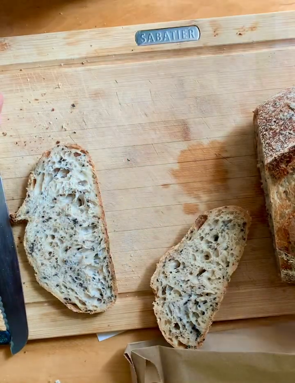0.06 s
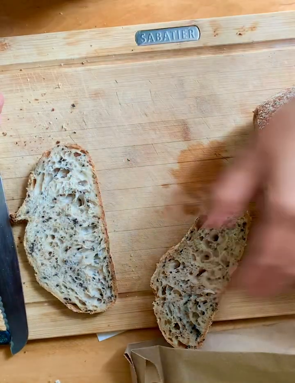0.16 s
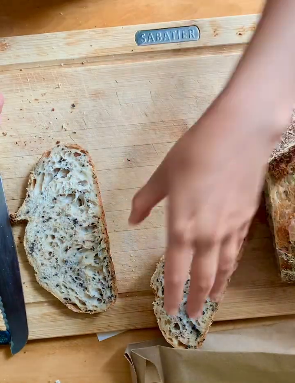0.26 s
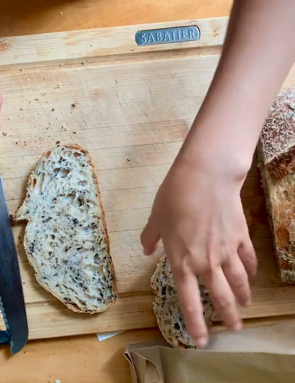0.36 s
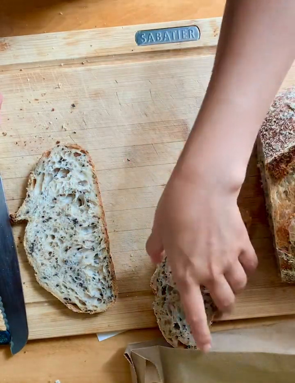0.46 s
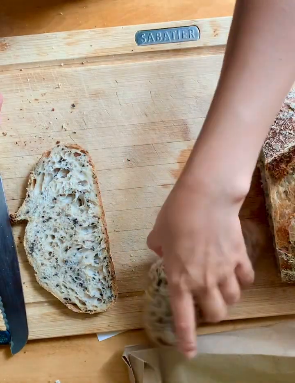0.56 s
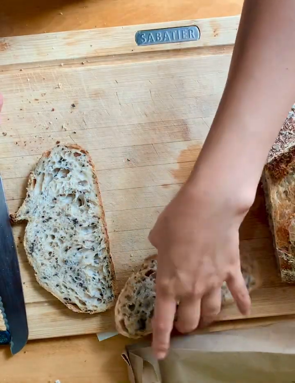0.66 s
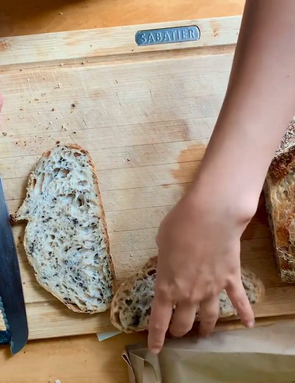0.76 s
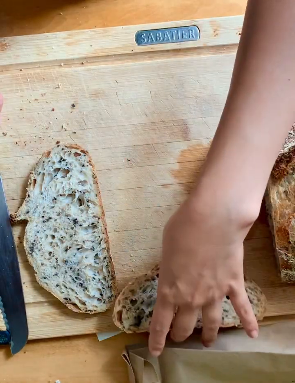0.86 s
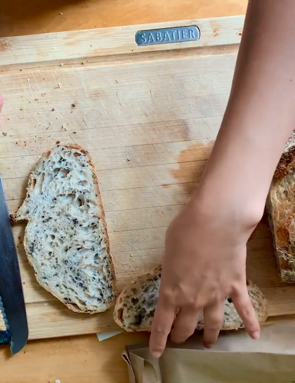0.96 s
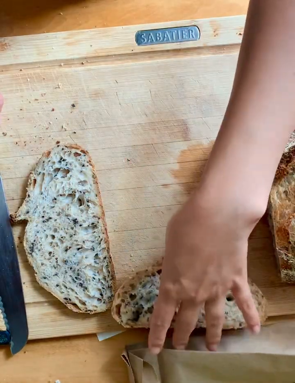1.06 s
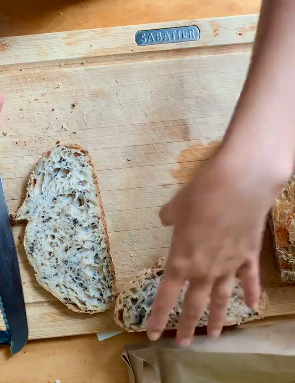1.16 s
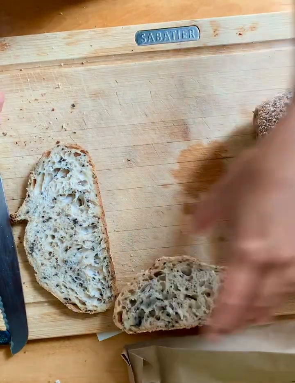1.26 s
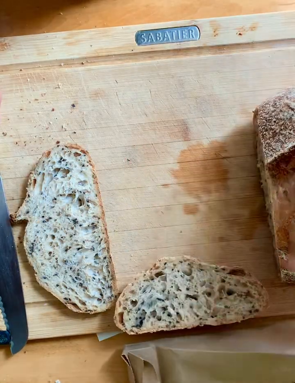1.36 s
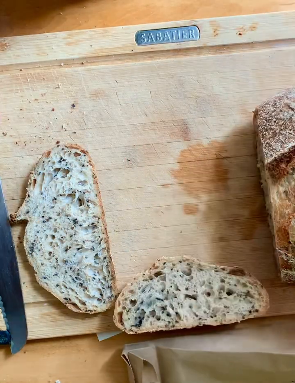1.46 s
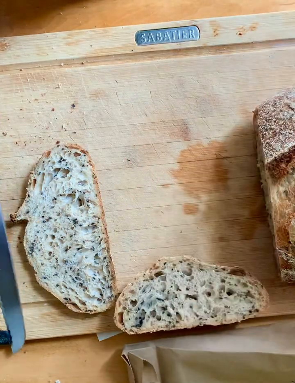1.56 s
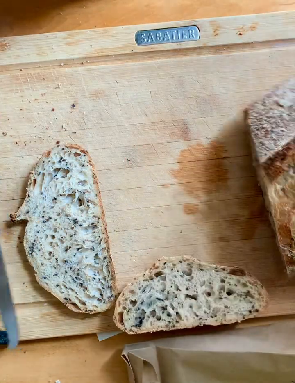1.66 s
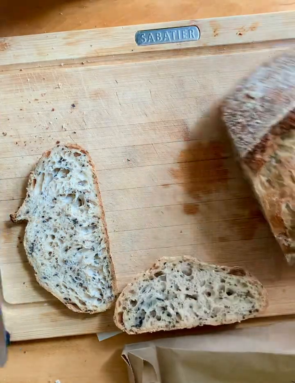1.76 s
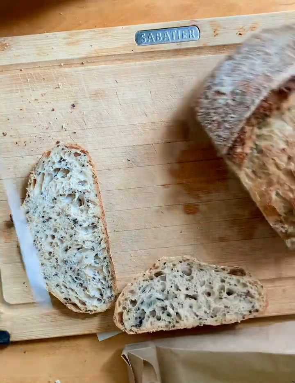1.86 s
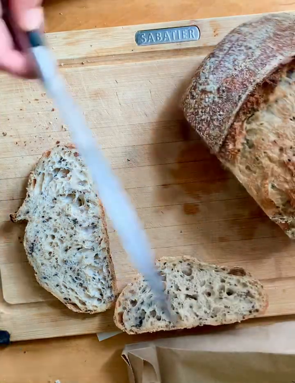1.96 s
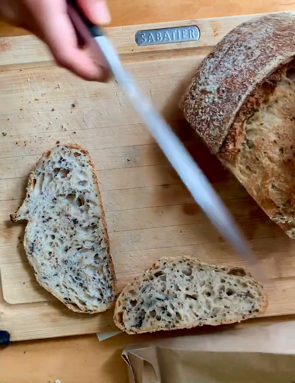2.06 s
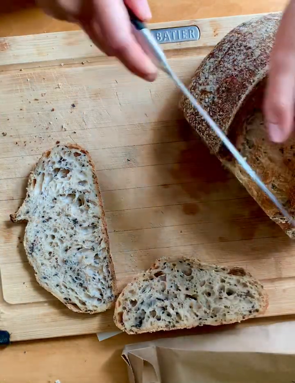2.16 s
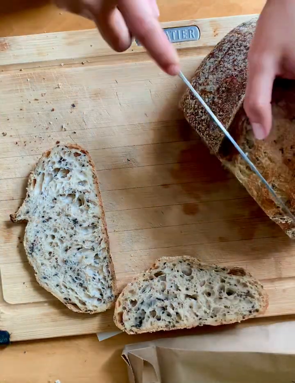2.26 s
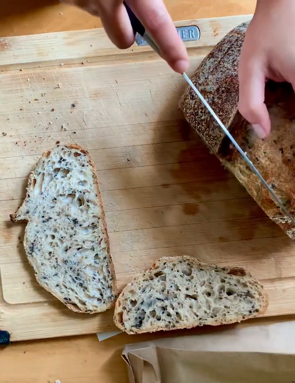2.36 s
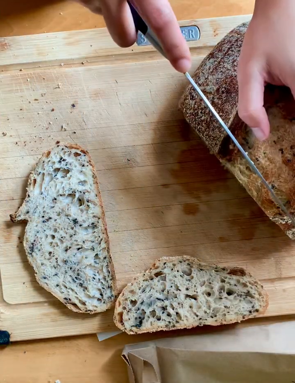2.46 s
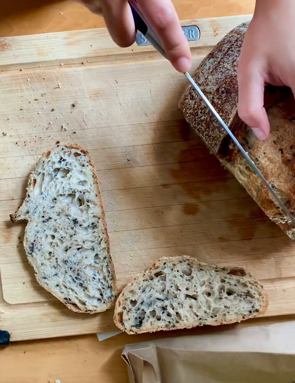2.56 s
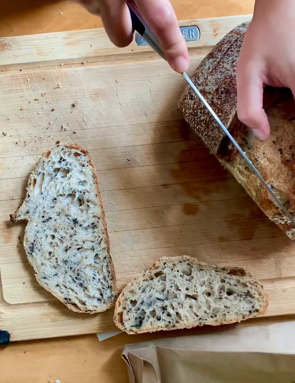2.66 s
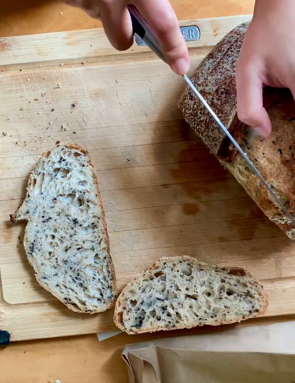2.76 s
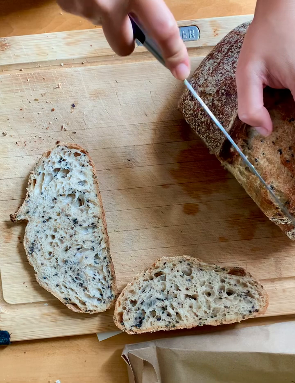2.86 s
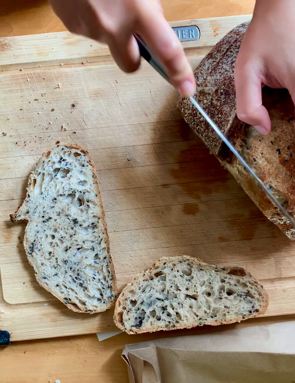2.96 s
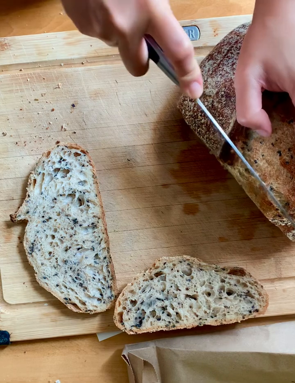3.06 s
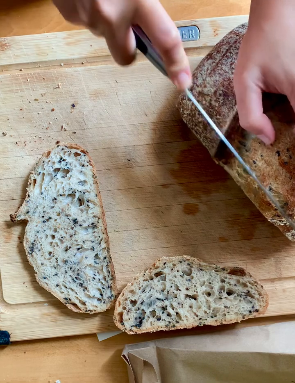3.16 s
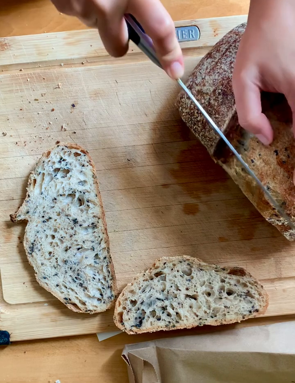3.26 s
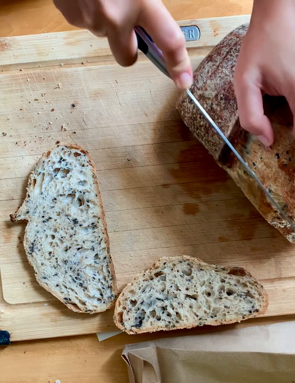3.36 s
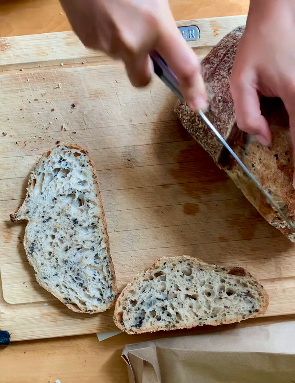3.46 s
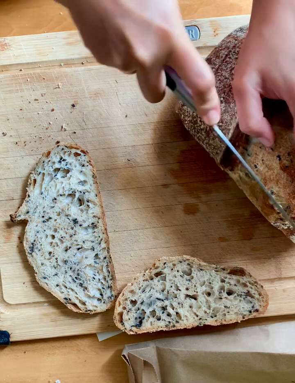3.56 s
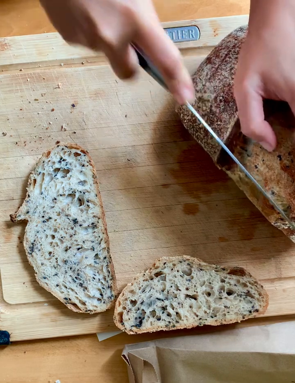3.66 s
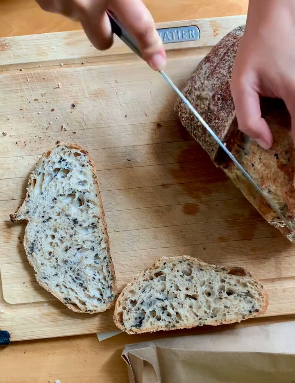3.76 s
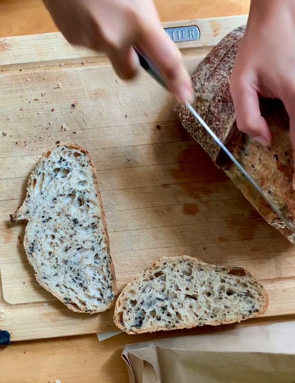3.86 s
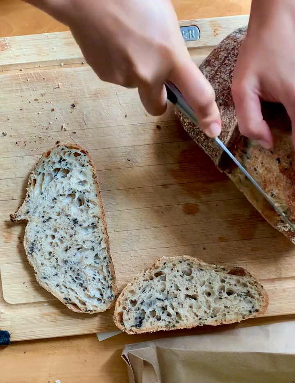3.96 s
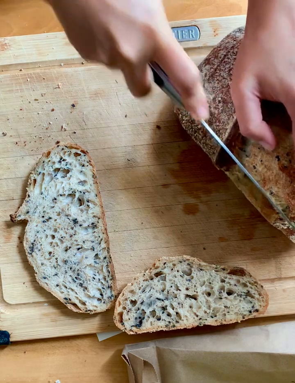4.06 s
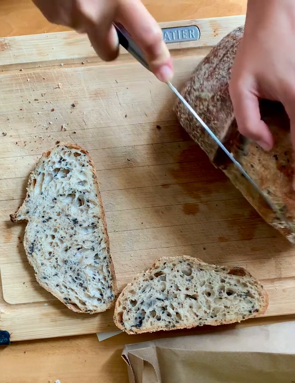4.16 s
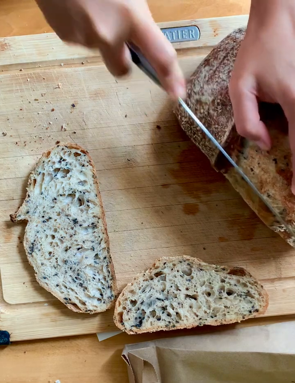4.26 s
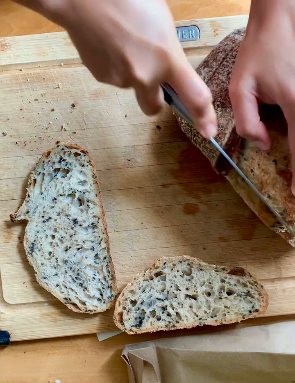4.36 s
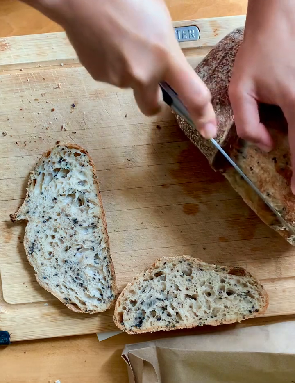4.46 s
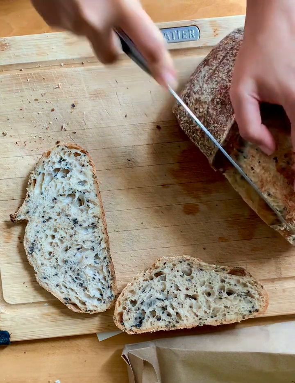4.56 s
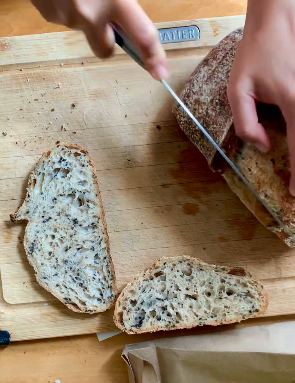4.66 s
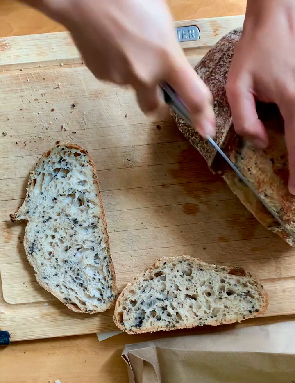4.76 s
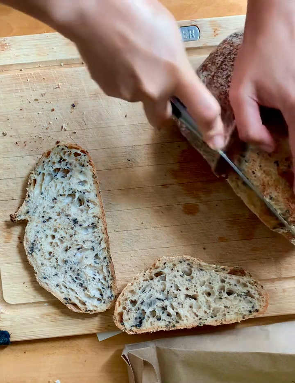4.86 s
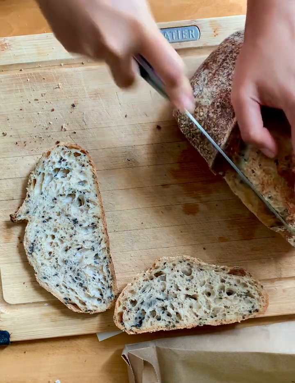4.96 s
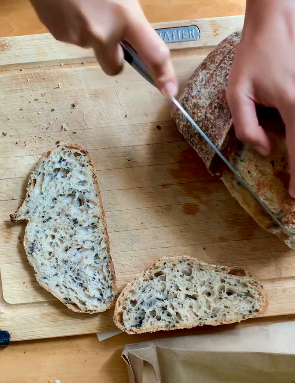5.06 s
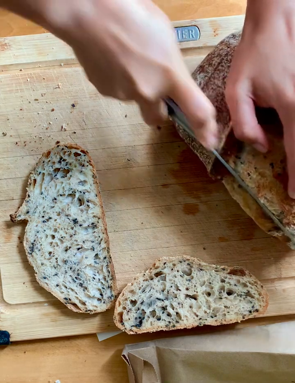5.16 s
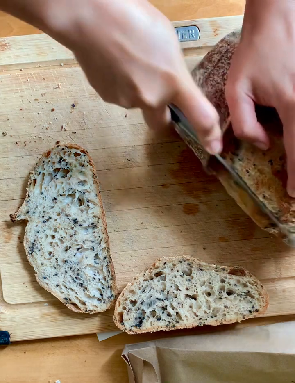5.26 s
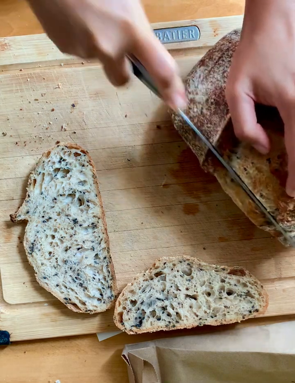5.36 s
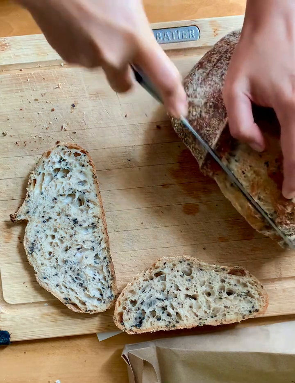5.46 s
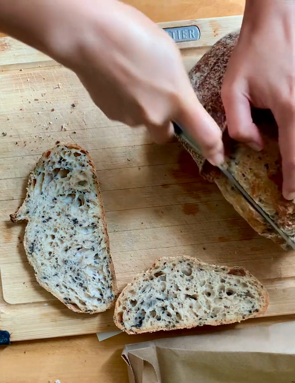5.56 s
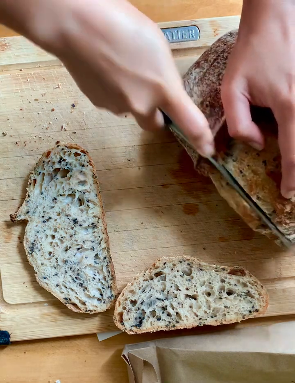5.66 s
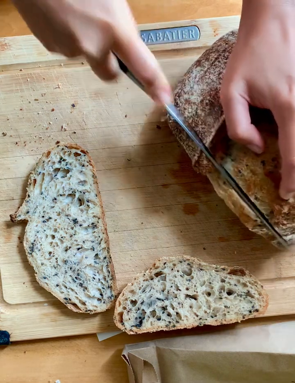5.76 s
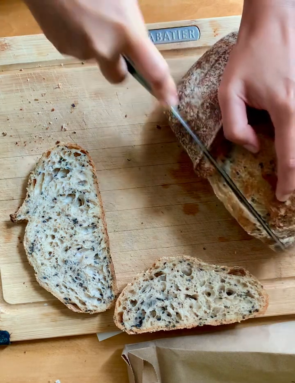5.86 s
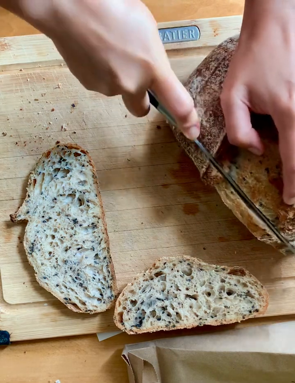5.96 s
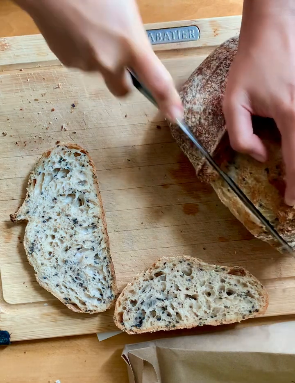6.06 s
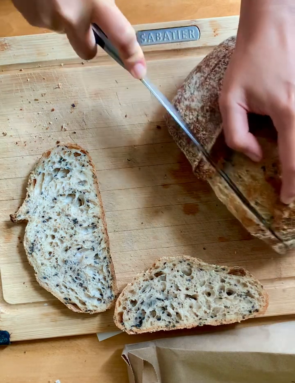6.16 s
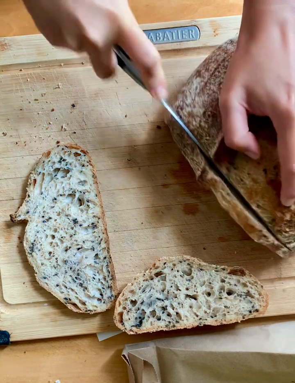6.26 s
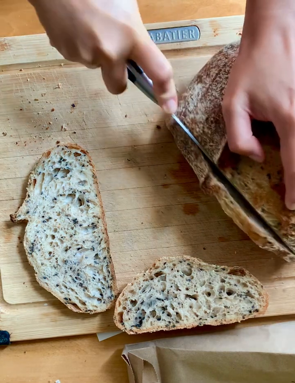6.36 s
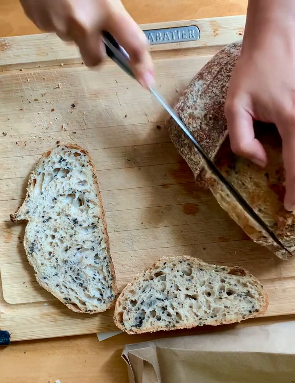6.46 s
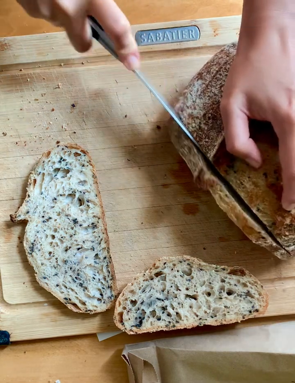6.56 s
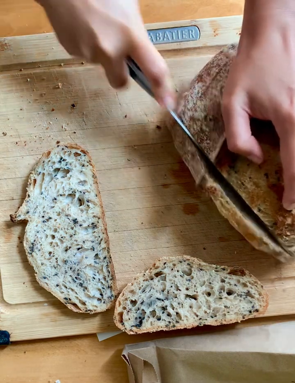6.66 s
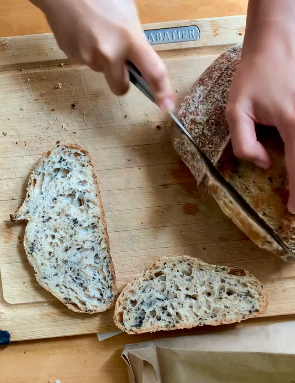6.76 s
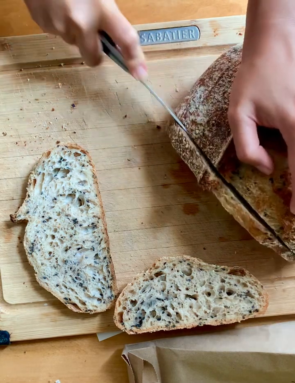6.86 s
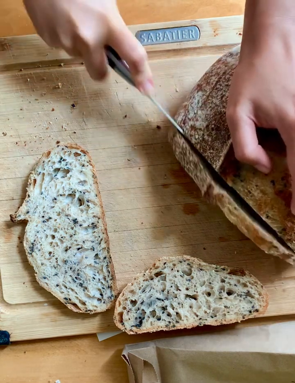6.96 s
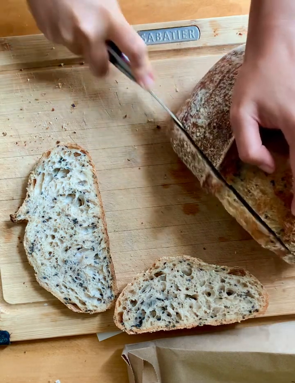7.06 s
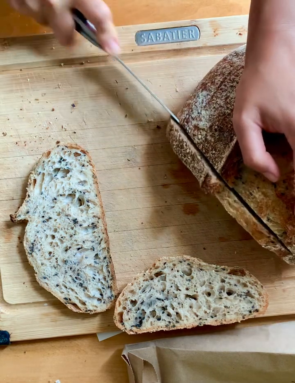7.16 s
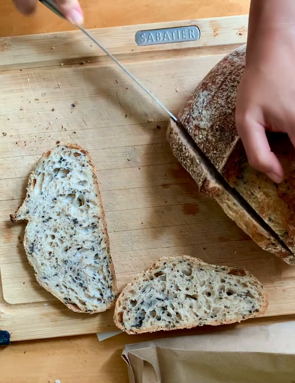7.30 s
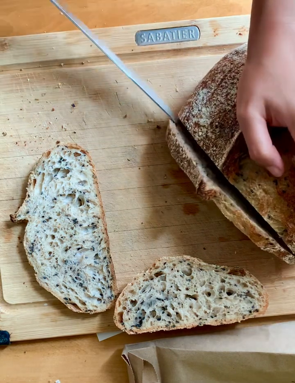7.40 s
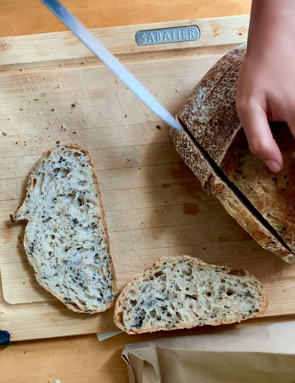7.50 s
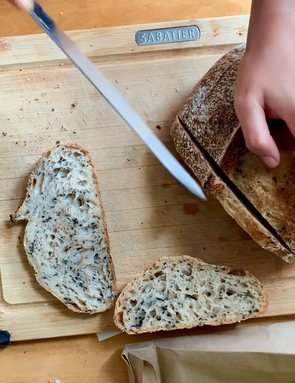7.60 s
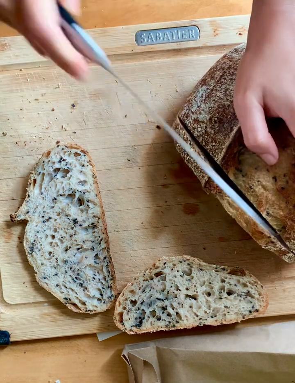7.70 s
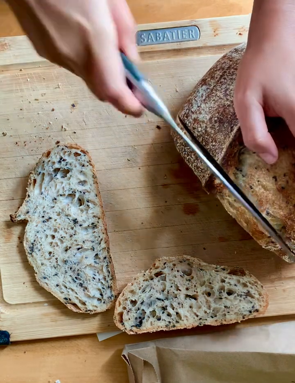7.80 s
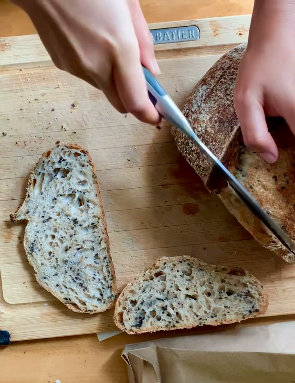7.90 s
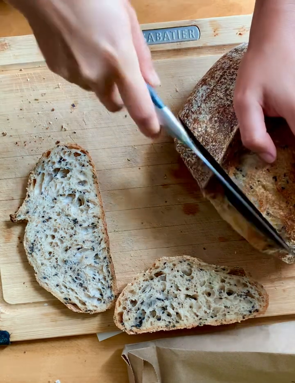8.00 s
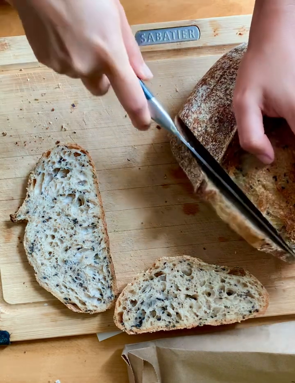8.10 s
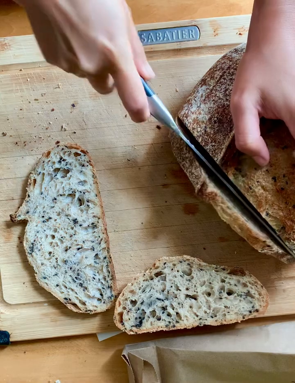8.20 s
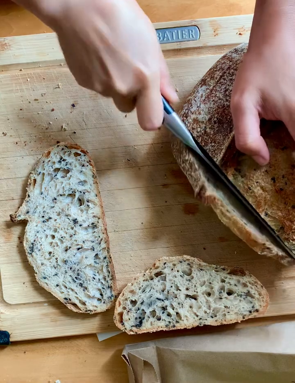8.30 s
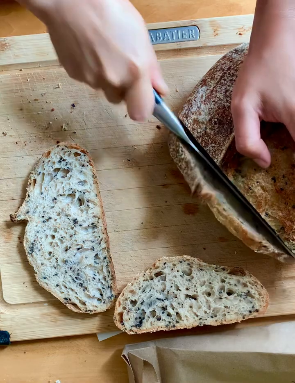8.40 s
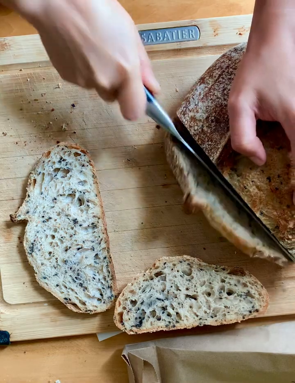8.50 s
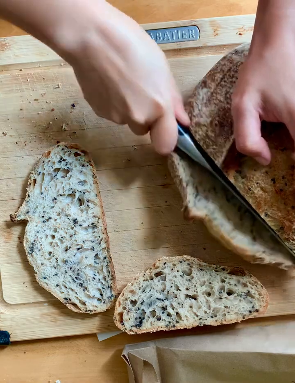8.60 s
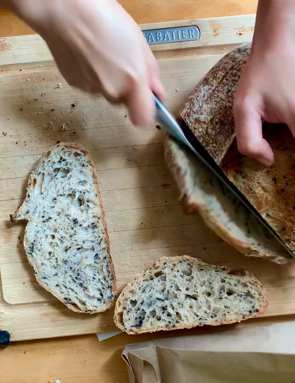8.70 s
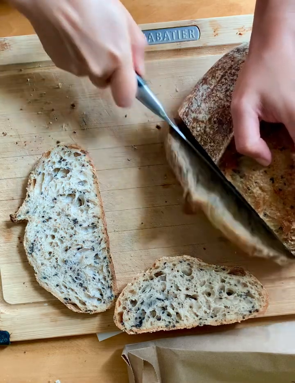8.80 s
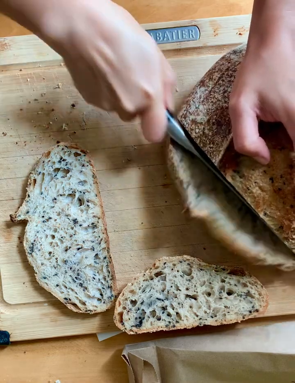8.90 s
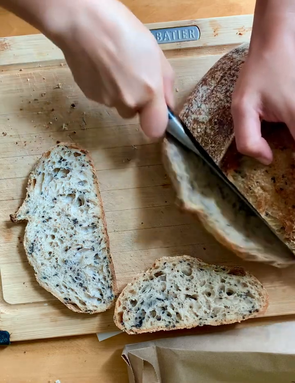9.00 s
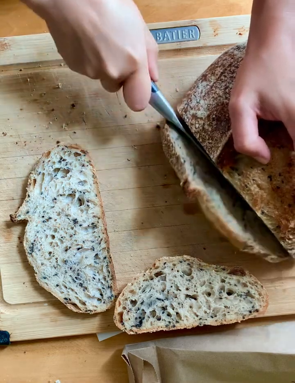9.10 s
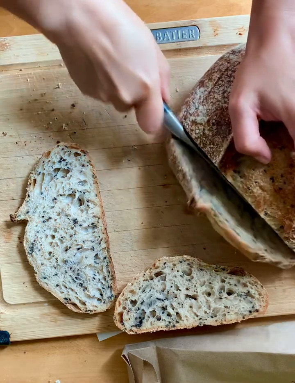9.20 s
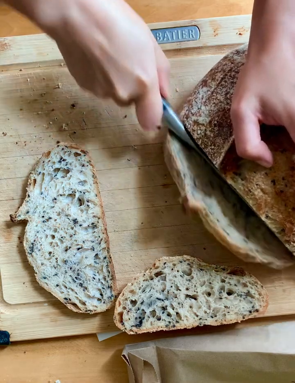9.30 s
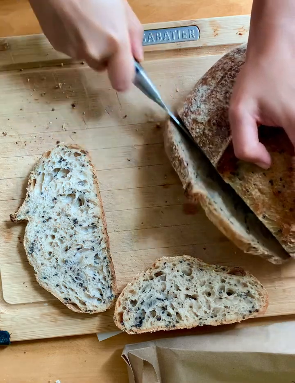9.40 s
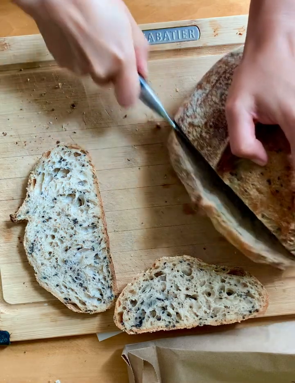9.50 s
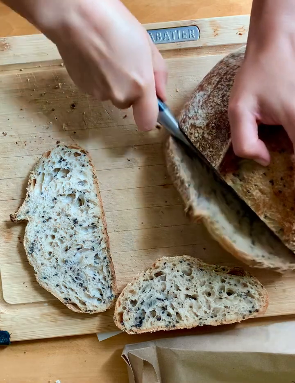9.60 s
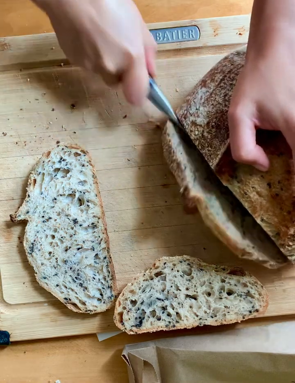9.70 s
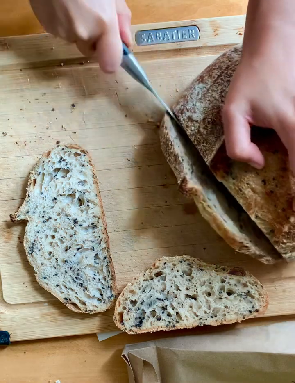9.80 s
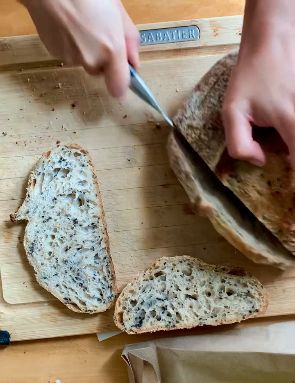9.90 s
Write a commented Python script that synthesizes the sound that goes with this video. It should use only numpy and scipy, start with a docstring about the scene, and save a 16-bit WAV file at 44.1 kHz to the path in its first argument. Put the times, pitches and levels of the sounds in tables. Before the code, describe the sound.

Close-up bread cutting: brief scrape and soft bumps, then brisk back-and-forth rasping with crisp crust snaps and low booming thuds in a quiet kitchen.

```python
"""Slicing a crusty loaf

A slice of bread is pushed aside, a loaf is dragged over a wooden board, then a serrated knife saws it.
Strokes are shaped noise: teeth rasp in the crumb, crackle in the crust and shake the loaf, which booms.
Snaps, knocks and the faintly ringing blade are short fading tones or noise; sliding bread is rubbing noise.
Two faint whistles fall in pitch. A close stereo microphone hears it all in a quiet, murmuring kitchen."""
import sys
import numpy as np
from scipy import signal
from scipy.fft import rfft, irfft, next_fast_len
from scipy.io import wavfile
from scipy.ndimage import uniform_filter1d, map_coordinates

SR = 44100
rng = np.random.default_rng(int(sys.argv[2]) if len(sys.argv) > 2 else 0)


def put_to_file(sound):
    """Save the sound as 16-bit audio at rate SR, in the file named by the first command-line argument."""
    columns = np.atleast_2d(sound).T  # one column per channel
    safe = np.clip(columns, -1, 1)
    whole_steps = np.round(safe * 32767)
    wavfile.write(sys.argv[1], SR, whole_steps.astype(np.int16))


N = 438354

# knife strokes, push and pull in turn: start_s, length_s, rasp_db, shake_db [s, s, dB, dB]
STROKES = [(2.895, 0.13, -37.5, -21.5), (3.096, 0.25, -41, -24), (3.408, 0.13, -30, -19),
           (3.587, 0.21, -34.5, -22.5), (3.789, .24, -33, -23), (4.003, 0.27, -37.5, -24),
           (4.219, .24, -35.5, -19), (4.446, 0.25, -38.5, -23.5), (4.651, 0.22, -33.5, -19.5),
           (4.87, 0.22, -39, -23.5), (5.067, 0.19, -36.5, -21.5), (5.25, 0.2, -40.5, -23),
           (5.437, .19, -39.5, -26), (5.63, 0.24, -40.5, -19), (5.84, 0.17, -40, -23.5),
           (6.022, 0.2, -40, -24), (6.206, 0.19, -40.5, -24), (6.401, 0.17, -41, -25.5),
           (6.581, 0.17, -35.5, -19), (6.754, 0.21, -44, -29), (6.92, 0.12, -43.5, -30),
           (7.014, 0.35, -39, -28.5), (7.305, 0.27, -57, -45), (7.8, 0.19, -52, -38.5),
           (8.008, 0.11, -39, -31), (8.215, 0.16, -52, -29.5), (8.37, 0.12, -44, -26),
           (8.488, 0.15, -42.5, -25.5), (8.643, 0.16, -40, -25.5), (8.803, 0.15, -39.5, -26),
           (8.976, 0.15, -41.5, -28), (9.122, 0.13, -43.5, -32.5), (9.273, 0.18, -41.5, -29),
           (9.432, 0.2, -39.5, -30.5), (9.611, 0.25, -42.5, -31), (9.838, 0.14, -37.5, -35)]
# crackle against the rasp, mostly sinking as the teeth leave the brittle top crust: time_s, level_db [s, dB]
CRISPNESS = [(2.9, -5), (3.2, -7), (3.65, -5), (4.1, -13.5), (5.1, -12), (6.1, -15), (7.0, -20),
             (7.87, -13), (8.1, -17.5), (8.8, -16), (9.7, -25.5)]
# the change from top crust to sides: begin_s, end_s [s]
TOP_CRUST_ENDS_S = [4.6, 5.05]
# the blade catches and the whole loaf rocks: time_s, level_db, pitch_hz [s, dB, Hz]
CATCHES = [(3.517, -15, 102), (4.393, -12.5, 107), (4.744, -6.5, 106.5), (5.2, -15, 106),
           (5.364, -10.5, 99), (5.734, -8, 117), (5.912, -14.5, 141), (6.67, -6, 102.7),
           (8.086, -20.5, 116), (8.461, -18, 112), (8.599, -15, 94.3), (8.748, -8.5, 91.4)]


def amp(db):
    """Turn decibels into a gain."""
    return 10 ** (np.asarray(db) / 20)


def unit(x):
    """Scale a sound to an average (rms) level of 1."""
    return x / np.sqrt(np.mean(x ** 2) + 1e-20)


def even(x, size):
    """Level a sound to rms 1 over every stretch of size samples."""
    return x / np.sqrt(np.abs(uniform_filter1d(x ** 2, size)) + 1e-12)


def along(points, hz):
    """Read a curve of (Hz, value) points on a logarithmic pitch axis."""
    f, v = np.transpose(points)
    return np.interp(np.log(hz + 1), np.log(f + 1), v)


def over_time(points, s):
    """Join (seconds, value) points by straight lines."""
    return np.interp(s, *np.transpose(points))


def wobble(rate):
    """Draw a smooth random curve through rate random points a second."""
    return map_coordinates(rng.standard_normal(int(N * rate / SR) + 4), [np.arange(N) * rate / SR])


def add(track, s, sound):
    """Mix a sound into the track at time s."""
    i = max(round(s * SR), 0)
    track[i:i + len(sound)] += sound[:max(N - i, 0)]


def filtered(x, response):
    """Change the strength and phase of each frequency by a given response."""
    m = next_fast_len(N + SR // 2)
    return irfft(rfft(x, m) * response(np.fft.rfftfreq(m, 1 / SR)), m)[..., :N]


def coloured(x, spectrum, peaks=()):
    """Colour a sound by a spectrum with resonant peaks on top, without ringing ahead of time."""
    size = 8192
    hz = np.fft.rfftfreq(size, 1 / SR)
    db = along(spectrum, hz)
    for centre, width, gain in peaks:
        db = db + gain / (1 + (2 * (hz - centre) / width) ** 2)
    # folding the cepstrum puts the energy of the filter as early as possible
    cepstrum = irfft(np.log(amp(db)))
    cepstrum[1:size // 2] *= 2
    cepstrum[size // 2 + 1:] = 0
    response = irfft(np.exp(rfft(cepstrum)))
    return signal.fftconvolve(x, response / np.linalg.norm(response))[:N]


def fractures(rate, spread_db, bed):
    """Tiny breaks of scattered size, about rate a second, on a bed of smooth friction noise; rms 1."""
    sizes = amp(spread_db * np.clip(rng.standard_normal(N), -2, 2)) * rng.choice([-1, 1], N)
    breaks = unit(sizes * (rng.random(N) < rate / SR))
    return unit(breaks + bed * rng.standard_normal(N))


def pings(drive, band_hz, t60, count):
    """Chips break at random moments and ring briefly at their own pitches, driven by drive; evened to rms 1."""
    when, pitch, size = rng.random((count, 3)).T[:, :, None]
    start, n = (when * N).astype(int), np.arange(300)
    hz = band_hz[0] + pitch * (band_hz[1] - band_hz[0])
    fade = amp(-14 * size - 60 * n / SR / t60)
    chips = drive[start] * fade * np.sin(2 * np.pi * hz * n / SR)
    return even(np.bincount((start + n).ravel(), chips.ravel(), N)[:N], size=5000)


def hollow(x, t60, share):
    """A hard shell adds a short, dense ring to each grain; the ring blends into a new one every 0.2 s."""
    size = SR // 5
    window = signal.windows.hann(2 * size, sym=False)
    t = np.arange(SR // 14) / SR
    padded, rung = np.pad(x, (size, 2 * size)), np.zeros(N + 4 * size)
    for i in range(0, N + size, size):
        ring = amp(-60 * t / t60) * rng.standard_normal(len(t))
        piece = signal.fftconvolve(window * padded[i:i + 2 * size], ring / np.linalg.norm(ring))
        rung[i:i + len(piece)] += piece
    share = np.clip(share, 0, 1)
    return np.sqrt(1 - share) * x + np.sqrt(share) * rung[size:size + N]


def kitchen(x):
    """The walls answer with one diffuse, fading tail; the highest treble dies first."""
    # how long the room rings: pitch_hz, fall_by_60_db_s [Hz, s]
    room_decay = [(100, 0.43), (500, 0.31), (3000, 0.38), (8000, 0.33), (16000, 0.11)]
    hz, t, z = signal.stft(rng.standard_normal(SR // 2), SR, nperseg=256)
    fade = amp(-60 * t / along(room_decay, hz)[:, None])
    tail = signal.istft(z * fade, SR, nperseg=256)[1]
    return signal.fftconvolve(np.pad(x, (200, 0)), tail / np.linalg.norm(tail))[:N]


def room_tone():
    """Coloured noise makes the steady low murmur of the kitchen, with a faint hum and a thin whine."""
    # spectrum of the murmur: pitch_hz, relative_level_db [Hz, dB]
    murmur = [(30, -25), (52, 9.5), (80, -3.5), (110, 4), (150, -9.5), (200, -8.5), (350, -18), (650, -22),
              (1000, -28), (2500, -48), (3600, -37.5), (5400, -40.5), (7000, -52.5)]
    hum_and_whine = [(451.4, 15.0, 12.4), (563.5, 11, 9.3), (679.5, 17, 11.0), (3410, 220, 11.0)]  # Hz, width Hz, dB
    return coloured(rng.standard_normal(N), murmur, hum_and_whine)


def slides():
    """Dry crust and crumbs scrape over the wood, as strongly as the bread moves fast."""
    # bread slides over the board or shifts under the hand:
    # start_s, length_s, peakedness of the speed, scrape_db, grit_db [s, s, power, dB, dB]
    moves = [(0.4854, 0.06, 5.5, -31.5, -36), (0.4596, 0.11, 1.2, -37, -48), (0.43, 0.43, 0.78, -59.5, -99),
             (1.019, 0.071, 0.63, -49.5, -57.5), (0.77, 0.1, 1.1, -60.5, -92), (1.34, 0.077, 1, -65.5, -90),
             (1.537, 0.42, 1.07, -31, -47.5), (2.52, 1, 0.41, -56, -79.5)]
    # spectra of the scrape and the grit: pitch_hz, relative_level_db [Hz, dB]
    scrape_colour = [(50, -15), (100, 16), (200, 6), (280, -8.5), (800, -3.5), (2100, -4), (3300, -5.5),
                     (5200, -14.5), (7000, -27), (16000, -52)]
    grit_colour = [(2200, -11), (3300, 5.5), (6200, 1.5), (11000, -0.5), (16000, -12.5)]
    # resonances of the rubbing crust, slice and loaf: pitch_hz, width_hz, boost_db [Hz, Hz, dB]
    slice_rub = [(1450, 640, 7), (3320, 430, 6.5)]
    loaf_rub = [(660, 59, 8.5), (1180, 82, 5), (1840, 190, 3.5), (2200, 74, 5), (2550, 310, -8)]
    fastest_share = 0.6  # where in a slide the bread is fastest
    loaf_from_s = 1.5  # the light slice is moved before this, the whole loaf after it
    scrape, grit = np.zeros((2, N))
    for start, length, peakedness, scrape_db, grit_db in moves:
        u = np.arange(0, 1, 1 / (length * SR))
        progress = np.interp(u, [0, fastest_share, 1], [0, .5, 1])
        speed = np.abs(np.sin(np.pi * progress)) ** abs(peakedness)
        add(scrape, start, amp(scrape_db) * speed)
        add(grit, start, amp(grit_db) * speed)
    grains = fractures(rate=3500, spread_db=5.5, bed=0.72) * amp(1.5 * wobble(90))
    rub = unit(hollow(grains, t60=0.061, share=0.93))
    rub = rub + amp(-10) * pings(amp(2 * wobble(90)), band_hz=(500, 6000), t60=.009, count=10000)
    is_slice = np.arange(N) / SR < loaf_from_s
    rub = np.where(is_slice, coloured(rub, scrape_colour, slice_rub), coloured(rub, scrape_colour, loaf_rub))
    crumbs = coloured(fractures(rate=4100, spread_db=0.0, bed=.6), grit_colour)
    return amp(-2.1) * scrape * rub + grit * crumbs


def rocking(events, rise_cycles, fall_cycles):
    """The bread rocks for a few cycles, a low tone that swells and dies."""
    out, t = np.zeros(N), np.arange(-SR // 10, SR // 10) / SR
    for s, db, hz in events:
        swell = np.exp(-.5 * (hz * t / np.where(t < 0, rise_cycles, fall_cycles)) ** 2)
        add(out, s + t[0], amp(db) * swell * np.sin(2 * np.pi * (hz * t + rng.random())))
    return out


def judders():
    """A caught blade swings the loaf; a bump gives a shorter and mostly higher thud."""
    # hands and knife bump the bread against the board: time_s, level_db [s, dB]
    bump_times = [(0.571, -32), (0.636, -27.5), (0.756, -36), (.837, -31.5), (1.063, -25), (1.148, -36),
                  (1.532, -35), (1.615, -30.5), (1.642, -30), (2.3, -29), (2.618, -31.5)]
    bump_hz = 152.5  # typical pitch, scattered by about a tenth
    bumps = [(s, db, bump_hz * np.exp(rng.normal(0, 0.1))) for s, db in bump_times]
    caught = rocking(CATCHES, rise_cycles=1.38, fall_cycles=1.6)
    return caught + rocking(bumps, rise_cycles=0.61, fall_cycles=1.16)


def whistles(blur_rate=800):
    """Faint, distant tones fall in pitch, blurred by random curves of blur_rate points a second."""
    # start_s, length_s, level_db [s, s, dB]
    falling_tones = [(0.64, 0.11, -57), (2.266, 0.11, -52.5)]
    from_hz, to_hz = 3830, 3020
    out = np.zeros(N)
    for s, length, db in falling_tones:
        u = np.arange(0, 1, 1 / (length * SR))
        phase = 2 * np.pi * np.cumsum(from_hz + (to_hz - from_hz) * u) / SR
        tone = wobble(blur_rate)[:len(u)] * np.cos(phase) + wobble(blur_rate)[:len(u)] * np.sin(phase)
        add(out, s, amp(db) * np.sin(np.pi * u) * tone)
    return out + amp(-2.5) * kitchen(out)


def blade(detune=0.0023, flutter=1.53):
    """Each pluck rings the steel at new strengths; the grip and the crust make the ring unsteady."""
    # teeth pluck the blade while it is free to ring: time_s, level_db [s, dB]
    plucks = [(2.2862, -38), (2.592, -46), (2.9216, -23), (3.029, -27.5), (3.2159, -19), (3.3552, -33),
              (3.8048, -26), (7.43, -45.5), (7.817, -37.5), (7.844, -36), (7.877, -29), (8.049, -30)]
    # ringing pitches of the steel: pitch_hz, relative_level_db [Hz, dB]
    steel_modes = [(2090, -8), (3220, -4.5), (4040, 3.5), (5100, 3.5), (6540, -3), (7760, -11), (9330, 8),
                   (10560, 5.5), (11960, -0.5), (14530, 5), (14930, 0)]
    # the edge reaches the wood: time_s, level_db, pitch_hz [s, dB, Hz]
    edge_hits = [(6.696, -28, 1884), (6.939, -24, 1710), (9.818, -15.5, 1753)]
    blade_t60_s, edge_t60_s = 0.12, 0.026  # time to fall by 60 dB
    out, t = np.zeros(N), np.arange(SR // 4) / SR
    for s, db in plucks:
        ring = 2.8 * amp(-60 * t / .02) * rng.standard_normal(len(t))  # the noisy start of the pluck
        for hz, level in steel_modes:
            # a random walk of the phase, about flutter radians in 10 ms
            drift = flutter * np.cumsum(rng.standard_normal(len(t))) / np.sqrt(SR / 100)
            phase = 2 * np.pi * (hz * (1 + detune * rng.normal()) * t + rng.random()) + drift
            ring += amp(level + rng.normal(0, 2) - 60 * t / blade_t60_s) * np.sin(phase)
        add(out, s, amp(db - 18.5) * ring)
    # the edge knocks on the wood: a dry, rough tock
    for s, db, hz in edge_hits:
        tock = np.sin(2 * np.pi * hz * t) * (1 + wobble(1400)[:len(t)])
        add(out, s, amp(db - 60 * t / edge_t60_s) * (1 - np.exp(-t / 0.0042)) * tock)
    return out


def stroke_levels(crackle_power, shake_lag_s):
    """Rasp, crackle and shake follow the speed of the blade, which stops at each turn."""
    # the cut: begin_s, end_s [s]
    cut_s = [2.9, 9.9]
    # where in a stroke the blade is fastest: first_jabs, last_eased_strokes [share of the stroke]
    fastest_shares = [0.28, 0.5]
    # how peaked the speed is: first_strokes, last_strokes [power]
    peakedness = [2.2, 0.95]
    rest_drag = .06  # share of the rasp that stays while the blade turns
    levels = np.zeros((3, N))
    for start, length, rasp_db, shake_db in STROKES:
        u = np.arange(0, 1, 1 / (length * SR))
        fastest = np.clip(np.interp(start, cut_s, fastest_shares), 0, 1)
        progress = np.interp(u, [0, fastest, 1], [0, .5, 1])
        speed = np.abs(np.sin(np.pi * progress)) ** np.interp(start, cut_s, peakedness)
        drag = rest_drag + (1 - rest_drag) * speed
        crackle_db = rasp_db + over_time(CRISPNESS, start + u * length)
        add(levels[0], start, amp(rasp_db) * drag)
        add(levels[1], start, amp(crackle_db) * speed ** crackle_power)
        add(levels[2], start + shake_lag_s, amp(shake_db) * speed)
    return uniform_filter1d(levels, size=200, axis=1)


def rasping(bites, clumps):
    """Teeth tear the crumb in uneven bites, coloured by the crust they pass and the place of the blade."""
    # spectra in the top crust, sides and bottom crust: pitch_hz, relative_level_db [Hz, dB]
    top_colour = [(120, -4), (235, 1.5), (520, -1), (800, -4.5), (1300, -4), (2500, -9), (4200, -7.5),
                  (16000, -48)]
    side_colour = [(120, -17), (260, -1.5), (600, -1), (850, -5.5), (1700, -5), (2600, -10.5), (4000, -6.5),
                   (5200, -24.5), (6500, -18), (9000, -23), (16000, -65)]
    bottom_colour = [(120, 1.5), (330, -5.5), (680, 2), (900, -5), (1800, -1.5), (2700, -9), (4500, -7.5),
                     (7000, -21.5), (16000, -44)]
    # resonances of loaf and blade in the cut: pitch_hz, width_hz, boost_db [Hz, Hz, dB]
    cut_resonances = [(291.6, 29, 9), (499, 78, 7.5), (651, 54, 8), (1161, 133, 9.5)]
    # the change from sides to bottom crust: begin_s, end_s [s]
    bottom_begins_s = [5, 8.8]
    cut_shift = .035  # share by which the resonances move up and down as the blade travels
    grains = fractures(rate=1400, spread_db=0.5, bed=0.55) * amp(1.76 * bites + 2.35 * clumps)
    teeth = even(hollow(grains, t60=0.057, share=0.6), size=4000)
    ticks = pings(amp(3 * bites), band_hz=(400, 6500), t60=.009, count=9000)
    teeth = amp(-2) * teeth + amp(-10.5) * ticks
    # the teeth pass from the arched top crust through the sides to the crust lying on the board
    t = np.arange(N) / SR
    top = np.interp(t, TOP_CRUST_ENDS_S, [1, 0])
    bottom = np.interp(t, bottom_begins_s, [0, 1])
    pushed_in = np.interp(t, [row[0] for row in STROKES], np.arange(len(STROKES)) % 2)
    rasp = np.zeros(N)
    # fade between resonances shifted up and shifted down
    for share, shift in (pushed_in, 1 + cut_shift), (1 - pushed_in, 1 - cut_shift):
        cut = [(hz * shift, width, db) for hz, width, db in cut_resonances]
        top_part = top * coloured(teeth, top_colour, cut)
        side_part = (1 - top - bottom) * coloured(teeth, side_colour, cut)
        bottom_part = bottom * coloured(teeth, bottom_colour, cut[2:])
        rasp += share * (top_part + side_part + bottom_part)
    return rasp


def crackling(bites, clumps):
    """Each bite chips the crust: tiny breaks and short pings, bright where the steel rings along."""
    # spectrum of the chips: pitch_hz, relative_level_db [Hz, dB]
    crackle_colour = [(1500, -26), (4000, -32), (5500, -0.5), (7400, -4.5), (9500, 8.5), (11300, 0.5),
                      (13000, 4), (15000, -6), (16500, -7.5)]
    # bands where the blade rings along with the chips: pitch_hz, width_hz, boost_db [Hz, Hz, dB]
    steel_bands = [(5430, 340, 12), (11200, 350, 5), (14520, 200, 9.5)]
    splinters = pings(amp(2 * bites), band_hz=(3000, 16500), t60=.008, count=15000)
    chips = unit(fractures(rate=1800, spread_db=5, bed=.35) * amp(2 * bites + 1.6 * clumps))
    chips = chips + amp(-6.5) * splinters
    chips = even(hollow(chips, t60=.05, share=.45), size=4000)
    return coloured(chips, crackle_colour, steel_bands)


def board(force):
    """The loaf on the board booms at its low resonances when a force shakes it."""
    # loaf on the board: pitch_hz, width_hz, relative_level_db [Hz, Hz, dB]
    boom_modes = [(77, 52.7, -7.5), (117.9, 20, 1), (179, 36.7, -10.5), (205.8, 14, -7.5)]

    def modes(f):
        """Sum the resonances with alternating sign."""
        total = 0
        for k, (c, w, db) in enumerate(boom_modes):
            total = total + (-1) ** k * amp(db) * 1j * f * w / (c * c - f * f + 1j * f * w)
        return total

    soft = signal.butter(3, [55, 260], "band", fs=SR, output="sos")
    return signal.sosfilt(soft, filtered(force, modes))


def sawing():
    """Teeth bite in uneven clumps; each stroke tears crumb, chips crust and tugs at the loaf."""
    rasp_level, crackle_level, shake_level = stroke_levels(crackle_power=1.32, shake_lag_s=0.019)
    bites, clumps = wobble(260), wobble(40)
    rasp = rasping(bites, clumps)
    crackle = crackling(bites, clumps)
    # level the boom to an even strength, so that shake_level alone shapes each stroke
    shake = even(board(fractures(rate=300, spread_db=3.5, bed=0.37)), size=2600)
    return amp(0.58) * rasp_level * rasp + amp(2.5) * crackle_level * crackle + shake_level * shake


def snaps(crumble_longer=8, crumble_db=-19):
    """A crack rings the broken piece at its own pitches, with a short trickle; each stroke adds small ones."""
    # crust breaks, or a tooth ticks free as the blade turns: time_s, level_db [s, dB]
    big_breaks = [(2.9214, -9), (3.03, -15), (3.1415, -21.5), (3.2166, -14), (3.3682, -21), (3.418, -20),
                  (3.4361, -12.5), (3.604, -19.5), (3.6212, -13.5), (3.669, -14), (3.8048, -18),
                  (4.0111, -25.5), (4.048, -27.5), (4.1458, -20.5), (4.2281, -26), (4.4635, -31),
                  (4.6507, -26), (4.717, -23), (4.8846, -33.5), (5.0607, -26), (5.2807, -33), (5.3356, -29),
                  (5.6957, -39), (5.927, -26), (6.279, -24), (6.895, -24), (7.2232, -16), (7.281, -30),
                  (8.0489, -18), (8.069, -22), (8.2922, -21.5), (8.5104, -33), (8.8544, -19.5),
                  (8.889, -20), (9.3744, -24.5)]
    # time to fall by 60 dB, longer in the top crust: top_pieces_s, later_splinters_s [s]
    break_t60_s = [0.034, 0.017]
    splinter_db, scatter_db = 4, 2.5  # small splinters against their stroke, and the spread [dB]
    splinter_t60_s = .006
    out, t = np.zeros(N), np.arange(SR // 8) / SR
    breaks = [(s, db, np.interp(s, TOP_CRUST_ENDS_S, break_t60_s)) for s, db in big_breaks]
    for start, length, rasp_db, _ in STROKES:
        db = rasp_db + .5 * over_time(CRISPNESS, start) + splinter_db
        for scatter in rng.normal(0, scatter_db, size=2):
            breaks.append((start + length * rng.beta(2, 2), db + scatter, splinter_t60_s))
    for s, db, t60 in breaks:
        piece = unit(np.sin(2 * np.pi * rng.uniform(2000, 15500, (8, 1)) * t).sum(axis=0))
        crack = amp(-60 * t / t60) * (piece + rng.standard_normal(len(t)))
        trickle = amp(crumble_db - 60 * t / (crumble_longer * t60)) * rng.standard_normal(len(t))
        add(out, s, amp(db - 15.0) * (crack + trickle))
    snap_colour = [(150, 7.5), (1200, 1.5), (2500, -4.0), (4500, 3), (7500, -8.5), (11000, -0.5),
                   (13000, -2.5), (15000, -8.5), (16500, -7)]  # Hz, relative dB
    return coloured(out, snap_colour)


def knocks():
    """Each knock rings the modes of the board at new strengths; the high ones die first."""
    # the crust gives way and the loaf knocks on the board: time_s, level_db [s, dB]
    loaf_knocks = [(2.925, -13.5), (2.975, -16.5), (3.437, -22), (3.479, -14), (3.674, -25), (3.947, -23),
                   (5.106, -25), (8.052, -29.5)]
    # ringing of the board under a knock: pitch_hz, relative_level_db [Hz, dB]
    wood_modes = [(150, -3.5), (212, -0.5), (293, -11), (395, -10.5), (505, -7), (1170, -9), (1310, -11)]
    wood_cycles = 41.6  # each mode falls by 60 dB within this many cycles
    catch_knock_db = -17.5  # a rocking loaf knocks too, its level lowered by this
    out, t = np.zeros(N), np.arange(SR // 6) / SR
    for s, db in loaf_knocks + [(s, db + catch_knock_db) for s, db, _ in CATCHES]:
        ring = np.zeros(len(t))
        for hz, level in wood_modes:
            fade = amp(level + rng.normal(0, 0.97) - 60 * hz * t / wood_cycles)
            ring += fade * np.sin(2 * np.pi * (hz * t + rng.random()))
        add(out, s, amp(db - 7.5) * (1 - np.exp(-t / 0.00062)) * ring)
    return out


def scene():
    """Everything happens near the middle; the counter and the walls add width."""
    bright = sawing() + knocks() + snaps() + blade() + slides() + whistles()
    mid = bright + judders() + amp(-13) * kitchen(bright) + amp(-48.5) * room_tone()
    counter = hollow(bright, t60=0.024, share=1)
    side = amp(-29.0) * kitchen(bright) + amp(-15.0) * counter + amp(-62.0) * room_tone()
    side_colour = [(130, -12.5), (350, 10.5), (2500, 14.0), (5000, -27)]  # Hz, dB
    side = filtered(side, lambda hz: amp(along(side_colour, hz)))
    return np.array([mid + side, mid - side])


def record(dry):
    """The two microphone ports hear the sound with a phase difference, steeply cut above the top frequency."""
    # how far the left port leads: pitch_hz, lead_rad [Hz, radians]
    port_lead = [(0, 0), (1100, .2), (3600, 1.4), (6400, 6), (7500, 6.5), (8400, 9.2), (9550, 9.8),
                 (10400, 12.2), (11600, 12.8), (12500, 15.3), (13800, 16.1), (14700, 18.8)]
    top_hz = 16100

    def ports(hz):
        """Split the lead evenly between left and right."""
        lead = np.interp(hz, *np.transpose(port_lead))
        band = 1 / (1 + (hz / top_hz) ** 150)
        return np.exp(.5j * np.array([lead, -lead])) * band

    return filtered(dry, ports) * amp([[-.25], [.25]])


dry = scene()
out = record(dry)
put_to_file(out)
```